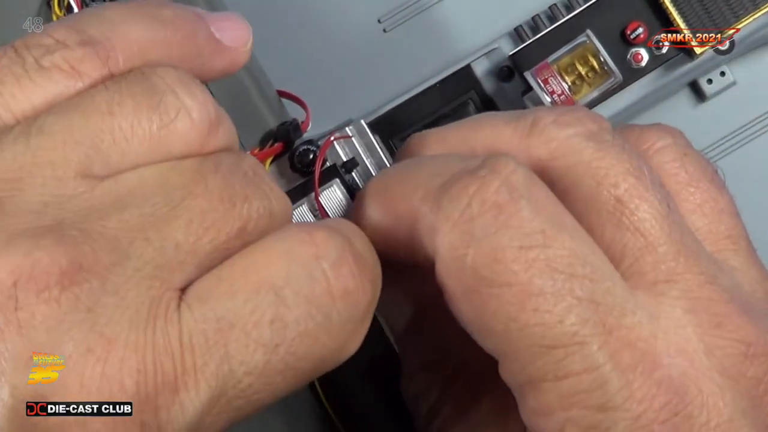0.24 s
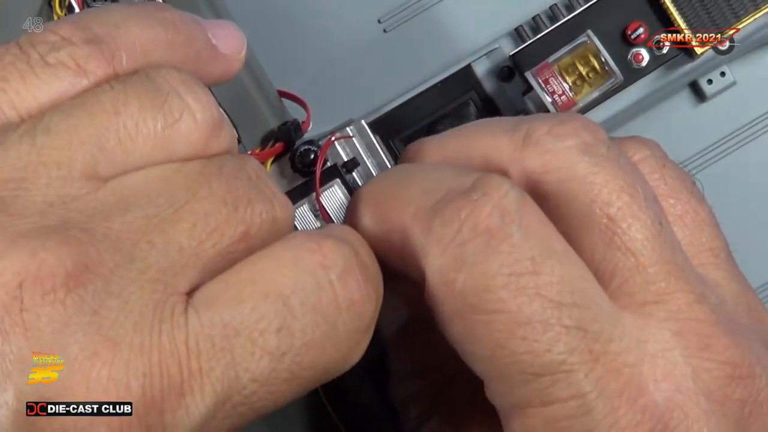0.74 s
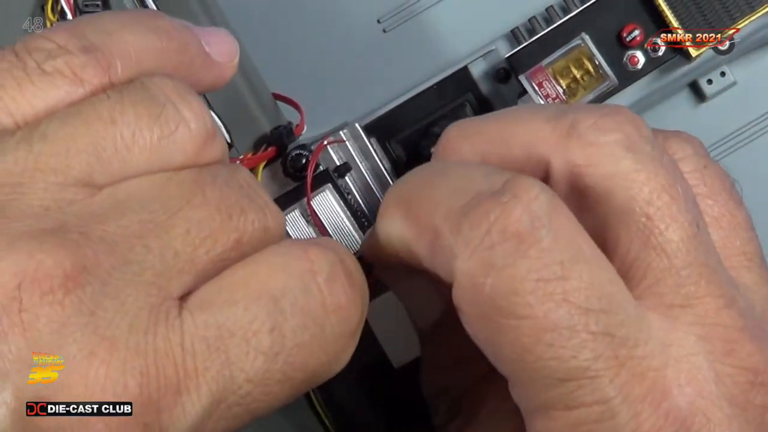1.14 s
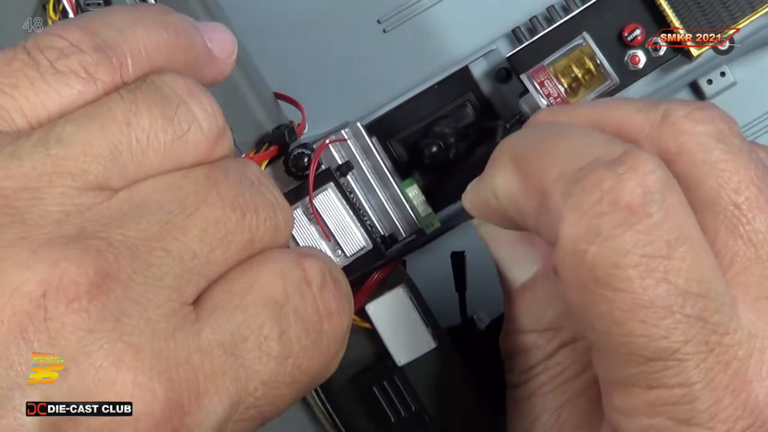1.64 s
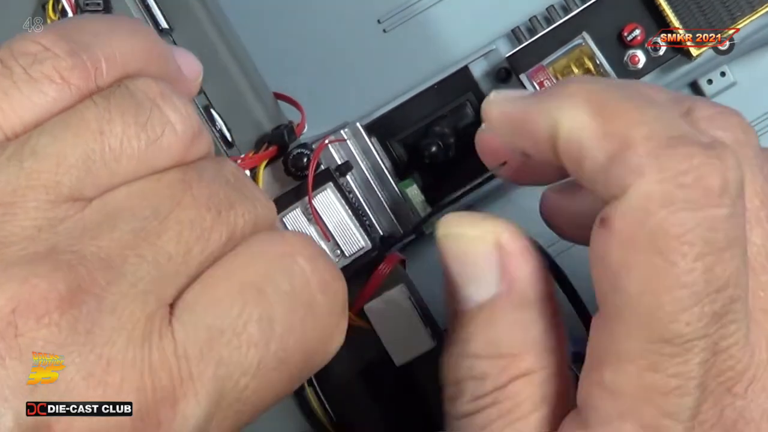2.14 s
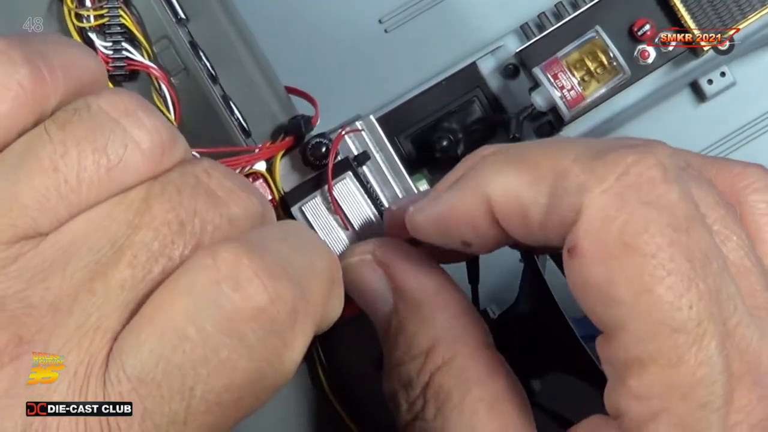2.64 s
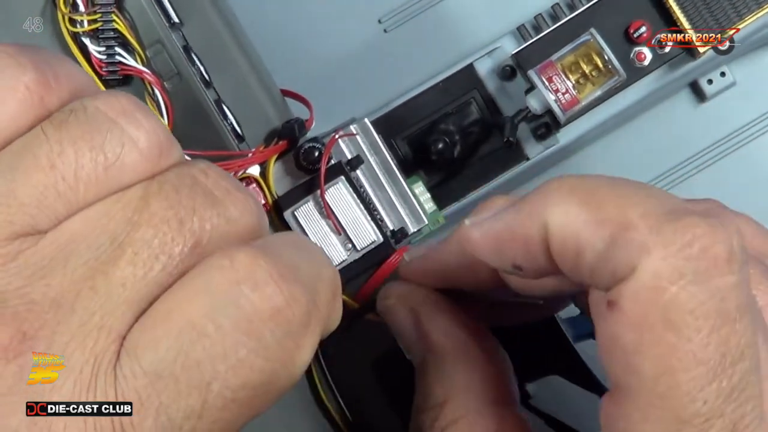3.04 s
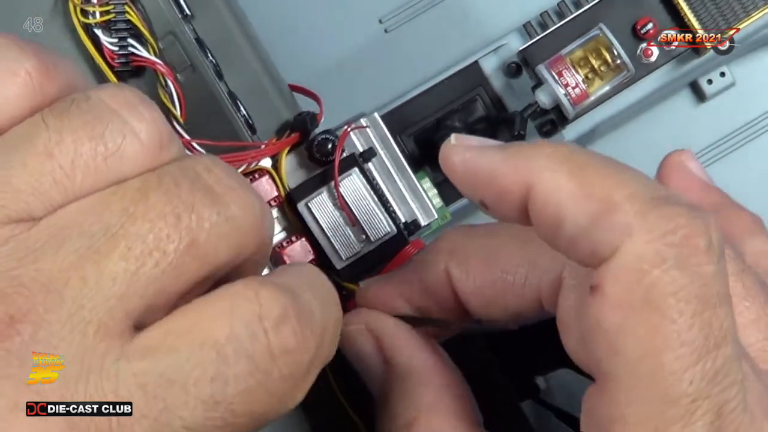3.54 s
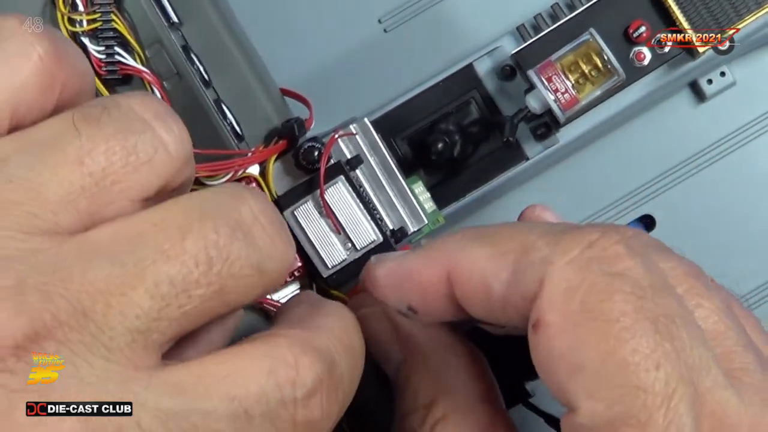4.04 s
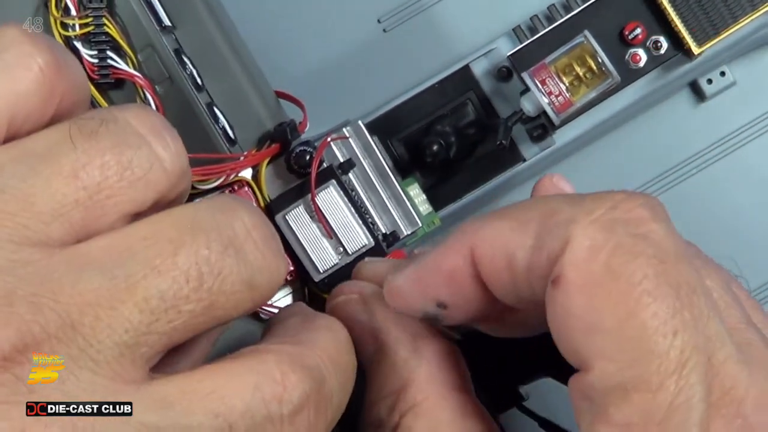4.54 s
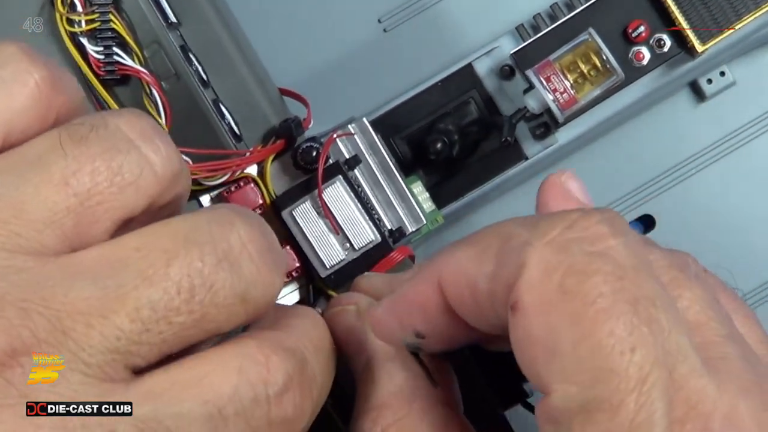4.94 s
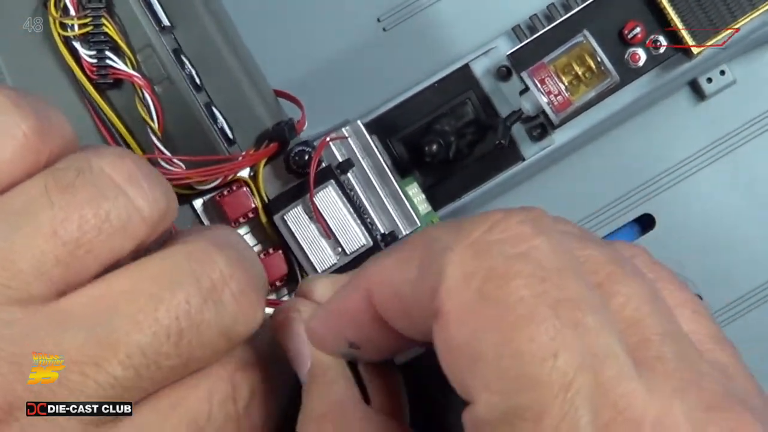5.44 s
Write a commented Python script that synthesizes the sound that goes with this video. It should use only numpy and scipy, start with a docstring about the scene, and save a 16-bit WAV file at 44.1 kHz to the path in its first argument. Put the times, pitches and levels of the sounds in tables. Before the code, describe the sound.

A close, quiet workbench, heard in stereo with the hands slightly to the right. Soft hiss, a thin high whine and a barely audible electrical buzz run throughout. From 0 to 0.75 s, only faint finger and wire touches. At 0.8 s the first nylon tie tightens with a tiny burst of crisp clicks; stronger separate snaps come at 1.04-1.1 s, then a very fast zip around 1.2-1.3 s, and further short volleys until 1.65 s, with a last click at 1.8 s. A brief rustle and soft tap follow. Sparse light touches continue, with a small plastic clack at 2.8 s. A very faint tone sinks from about 3.5 to 4.3 s. From 4.7 to 5.25 s the second tie clicks more slowly and unevenly, slightly more ringing. A sharp, hard plastic knock lands at 5.27 s, trailing into small taps and rising rustle until the end.

```python
"""Two cable ties pulled tight

Two nylon cable ties are pulled tight around a small board on a plastic chassis; each tooth snaps past the pawl.
Fingers nudge wires and plastic parts in between. Snaps and touches are short noise rattles through resonances.
A quiet room hisses and hands rustle (coloured noise); electronics whine (sines) and buzz (puffs of noise).
A faint far tone sinks slowly (a sine).
"""
import sys
import numpy as np
from scipy import signal
from scipy.fft import rfft, irfft
from scipy.io import wavfile

SR = 44100
rng = np.random.default_rng(int(sys.argv[2]) if len(sys.argv) > 2 else 0)


def generate_wav(signal):
    """Clip the signal to [-1, 1] and save it as 16-bit WAV at the path in sys.argv[1]."""
    frames = np.transpose(np.atleast_2d(signal))
    scaled = np.clip(frames, -1, 1) * 32767
    pcm = np.round(scaled).astype(np.int16)
    wavfile.write(sys.argv[1], SR, pcm)


N = 250488

# a tooth snaps past the pawl; grip and zone shares are added to its level: (time [s], level [dB])
TOOTH_SNAPS = [(0.8061, -17.5), (0.8091, -17.5), (0.8181, -19.5), (0.8246, -18.5), (0.8286, -18.0),
               (0.8351, -19), (0.8412, -18.5), (0.8492, -15.5), (0.8532, -22), (0.8674, -17.5),
               (1.0363, -14.0), (1.0486, -13.5), (1.0666, -12), (1.0789, -10.5), (1.0963, -13),
               (1.1781, -15), (1.1852, -11.5), (1.193, -12.5), (1.1979, -17), (1.3378, -17),
               (1.3508, -17.5), (1.3621, -16), (1.3713, -17.0), (1.3808, -16.5), (1.3913, -16.0),
               (1.4059, -17), (1.477, -15), (1.494, -16.0), (1.513, -16.5), (1.5229, -19.5), (1.5415, -17),
               (1.5715, -18.5), (1.5799, -18.5), (1.6036, -19), (1.6126, -18), (1.639, -19.5),
               (1.6557, -19.5), (1.7923, -17.5), (4.7074, -17), (4.7356, -16.5), (4.7546, -17.5),
               (4.7723, -18.5), (4.8275, -16.5), (4.855, -18), (4.8719, -19), (4.8907, -17.5),
               (4.9433, -17.5), (4.9877, -18.0), (5.0822, -17), (5.1318, -17.5), (5.2049, -18),
               (5.2451, -17)]
# the grip on the strap sets the colour of a pull:
# (start [s], body [dB], fizz [dB], extra weight in the lowest zone [dB])
GRIPS = [(0.8, -4.5, 5.5, -2.5), (1.03, -5.5, 1, -5), (1.17, -2.1, 4.5, -2.5), (1.2, 3.5, 4, 4),
         (1.225, 8, 3.5, 1.5), (1.25, 9, 4.5, 2.5), (1.33, -3, -9, -3), (1.47, -1.2, -2, 0),
         (1.56, -0.4, -2.5, -0.3), (1.78, -2, -12, 1.8), (4.7, -1.5, 1, -1.3), (4.82, -0.2, -2.5, -2.1),
         (4.93, -0.1, -0.5, -1), (5.07, 0.5, 2, 2), (5.2, 2, 1, 2.5)]
# fingers, wires and parts touch the chassis:
# (time [s], level [dB], centre [Hz], narrowness [dB per squared octave, below 0 counts as 0])
TOUCHES = [(0.003, -50, 6500, 4), (0.017, -45, 3500, 2.5), (0.028, -50, 3200, 12), (0.06, -37.5, 6300, 1.5),
           (0.137, -48.5, 3000, 2), (0.189, -39, 3970, 7.5), (0.238, -48.5, 1100, 5),
           (0.278, -50.5, 2000, 2), (0.629, -45, 7000, 6), (0.631, -42, 1510, 5), (0.756, -54, 2500, -0.2),
           (1.832, -37.5, 3000, 0.4), (1.844, -31, 1510, 1.2), (1.958, -49, 1500, 3),
           (2.011, -46, 11000, 1), (2.025, -52, 9000, 2.5), (2.088, -47, 3400, 3.5),
           (2.099, -43.5, 2900, 3), (2.413, -46.5, 700, 5), (2.565, -55, 10000, 4),
           (2.7647, -42.5, 3980, 0.5), (2.7807, -31, 5500, 1), (2.79, -24.5, 5500, 1.5),
           (2.794, -26, 2800, 4), (2.8079, -36, 5500, 0.5), (2.819, -42, 2700, 1), (2.956, -49, 2800, 3),
           (3.067, -49, 3400, 9), (3.12, -49, 2500, 8), (3.49, -43, 700, 8), (3.506, -47, 700, 8),
           (3.527, -40.5, 4530, 2.2), (3.549, -50, 700, 8), (3.672, -43.5, 6300, 9),
           (3.928, -44, 1210, 4.5), (3.958, -49.5, 3000, 1.5), (4.071, -48, 1950, 9), (4.13, -53, 9400, 12),
           (4.151, -48.5, 1150, 4.5), (5.271, -23.5, 2500, 0.1), (5.2723, -18.5, 6000, 0.8),
           (5.278, -20, 1210, .9), (5.287, -27, 1300, .8), (5.302, -31, 2000, 3),
           (5.313, -42.5, 6000, -0.3), (5.329, -41, 2800, 0.1), (5.351, -48, 1500, 1),
           (5.379, -50, 1800, 7), (5.412, -47, 4470, 0.2), (5.452, -42, 2200, 1.8), (5.523, -37, 1260, 6.5),
           (5.556, -38.5, 3000, 4.5), (5.579, -38.5, 4540, 1.2), (5.588, -40.5, 4500, 0.5),
           (5.612, -36, 680, 1), (5.626, -52, 700, 4)]
# six pitch zones, low to high: (bottom [Hz], top [Hz])
ZONES_HZ = [(320, 1450), (1450, 2600), (2600, 4500), (4500, 8000), (8000, 11000), (11000, 18000)]
# time a snap takes to fall by 60 dB, one per zone: (time [s])
SNAP_T60_S = [0.063, 0.031, 0.018, 0.018, 0.016, 0.0073]
# the same for a soft touch: (time [s])
TOUCH_T60_S = [0.082, 0.038, 0.014, 0.031, 0.013, 0.034]
# resonances of each tie with the chassis under it: (pitch [Hz], width [Hz], gain [dB])
FIRST_TIE = [(398, 66, -15), (965, 230, -3), (1340, 66, -4.5), (2040, 200, -3), (2340, 90, -2),
             (3190, 293, 1.5), (3825, 225, 0), (5900, 830, -2.5), (9890, 650, 0), (11860, 890, -2.5),
             (13000, 300, -32)]
SECOND_TIE = [(435, 810, -19), (1362, 65, -1.5), (2035, 200, 0.5), (2313, 213, 5), (2934, 57, 7),
              (4130, 65, 0.5), (5530, 300, -2.5), (8900, 130, -13), (10120, 730, 0.5), (11400, 640, -6),
              (12900, 350, -2)]
# resonances of the chassis alone: (pitch [Hz], width [Hz], gain [dB])
CHASSIS = [(373, 35, -19), (1355, 53, -2), (2000, 470, -15.5), (3046, 340, -4.5), (4000, 130, -16),
           (6100, 300, -25), (10230, 1200, -1)]
# share of a snap in each zone at a middling grip: (level [dB])
FIRST_SHARE_DB = [-21, -14.5, -9, -11.5, -6.5, -8]
SECOND_SHARE_DB = [-16, -16, -9, -6.5, -7, -5.5]
# how far each zone follows the body of a grip, and its fizz: (factor [no unit])
BODY_REACH = [0.084, 1.15, 0.2, 0.3, -.1, -0.14]
FIZZ_REACH = [-0.26, -0.18, -0.34, 0.049, -0.14, 0.96]
# reflections around the bench, one per zone: (level [dB]), then (left-right likeness [no unit])
WASH_DB = [-7.5, -6, -12, -6.5, -16.5, -13]
WASH_ALIKE = [0.36, 0.91, 0.97, 0.32, 0.98, 0.86]
# how far the right side runs ahead of the left: (pitch [Hz], lead [radians])
RIGHT_LEAD = [(100, 0.11), (860, 0.69), (3000, 0.66), (8000, 0.45), (15000, 0.1)]
# clothes and skin rustle as the hands move: (time [s], level [dB])
RUSTLE = [(0, -50.5), (.06, -61.5), (.7, -59.5), (1.77, -58), (1.82, -44.5), (1.87, -54), (2.15, -61.5),
          (2.7, -59), (2.95, -56.5), (3.4, -72), (3.55, -57), (4.2, -68.5), (5.2, -54), (5.5, -50.5),
          (5.6, -47.5), (5.68, -52)]
# spectrum of the rustle: (pitch [Hz], level [dB per Hz])
RUSTLE_COLOUR = [(88, -47), (150, -8.5), (413, -5), (1350, 0), (1610, -8), (2620, -6), (4790, -13),
                 (10400, -12), (15700, -21)]
# spectrum of the room hiss: (pitch [Hz], level [dB per Hz])
HISS_COLOUR = [(15, -56), (25, -22), (75, -23.5), (129, -7.5), (199, -14), (360, -6.5), (2310, -10),
               (2500, -4), (2710, -13.5), (3360, -10), (4400, -15.5), (6770, -14.5), (7540, -17),
               (14400, -19), (15600, -14.5)]
# how alike the hiss is left and right: (pitch [Hz], likeness [-1 to 1])
HISS_ALIKE = [(60, 0.45), (130, 1), (290, 0.39), (640, -0.15), (1410, -0.42), (3100, -0.011), (6820, 0.14),
              (15000, 1)]
# the two thin whines: (pitch [Hz])
WHINE_HZ = [2518, 15735]
# their strength: (level [dB], waver [dB])
WHINES = [(-59, 1.9), (-60.5, .4)]
# small resonances of the buzz: (pitch [Hz], width [Hz], level [dB])
BUZZ = [(3455, 95, -64), (4054, 53, -67.5), (5050, 120, -70.5), (6750, 300, -69.5)]
# a faint far tone sinks slowly: (time [s], pitch [Hz], level before FAR_TONE_LIFT_DB [dB])
FAR_TONE = [(3.48, 706, -84), (3.55, 691, -67), (3.75, 663, -68), (4.0, 630.5, -70), (4.28, 607, -68),
            (4.36, 609, -90)]

SECOND_TIE_S = 3.0   # snaps from here on belong to the second tie
# one fast zip of teeth
ZIP_START_S, ZIP_TEETH, ZIP_DB = 1.2045, 15, -20
ZIP_GAP_S, ZIP_LAST_DELAY_S = 0.004, 0.0076
REBOUND_S = 0.0015   # the pawl lands, then slaps back; the rattle swells in between
THUD_DB, THUD_HZ, THUD_T60_S = -33, 59, 0.19   # level is relative to the lowest zone
WASH_T60_S, WASH_BUILD_S = 0.11, 0.0034
RIGHT_DB = 0.6
FAINT_TOUCHES, FAINT_DB, FAINT_NARROW_DB = 8, -56, 5   # lighter touches fall anywhere
UNEVEN_DB = 2     # no touch fills the zones smoothly
BASS_LOSS = 2.2   # small parts radiate little below their centre: the fall is this much steeper there
HISS_DB, ROOM_TOP_HZ = -50, 15900
BUZZ_HZ, BUZZ_START_S = 59.94, 0.0105
BUZZ_WEAK_DB, BUZZ_WIDTH = -5, 0.14   # every other puff is weaker; width is a share of a turn
FAR_TONE_LIFT_DB = 3
CUTOFF_HZ = 17100


def ties():
    """Each snap takes the colour and fine pattern of its pull; the first tie is pulled early, the second late."""
    times, db = np.transpose(TOOTH_SNAPS + fast_zip())
    starts, body, fizz, weight = np.transpose(GRIPS)
    pull = np.searchsorted(starts, times + 0.004) - 1   # the latest grip, with 4 ms of slack
    zone_db = db[:, None] + np.outer(body[pull], BODY_REACH) + np.outer(fizz[pull], FIZZ_REACH)
    zone_db[:, 0] += weight[pull]
    first = times < SECOND_TIE_S
    second = ~first
    first_tie = blows(times[first], zone_db[first] + FIRST_SHARE_DB, pull[first], SNAP_T60_S, FIRST_TIE,
                      tick_db=12, rebound_db=-5, swell_s=0.0005, alike=0.7)
    second_tie = blows(times[second], zone_db[second] + SECOND_SHARE_DB, pull[second], SNAP_T60_S, SECOND_TIE,
                       tick_db=8.2, rebound_db=1.5, swell_s=0.00058, alike=0.69)
    return first_tie + second_tie


def fast_zip():
    """Teeth of one zip: the strap runs evenly, then slows, each delay twice the one before."""
    delays = ZIP_LAST_DELAY_S / 2 ** np.arange(ZIP_TEETH - 1)[::-1]
    times = ZIP_START_S + np.cumsum([0, *(ZIP_GAP_S + delays)])
    return [(s, ZIP_DB) for s in times]


def touches():
    """Soft contacts that swell slowly, each strongest around its own centre."""
    faint = [(when * N / SR, FAINT_DB, 700 * 2 ** (4 * high), FAINT_NARROW_DB)
             for when, high in rng.random((FAINT_TOUCHES, 2))]
    s, db, hz, narrow = np.transpose(TOUCHES + faint)[:, :, None]
    octaves = np.log2(np.sqrt(np.prod(ZONES_HZ, axis=1)) / hz)   # from the centre to each zone
    steepness = np.maximum(narrow, 0) * np.where(octaves < 0, BASS_LOSS, 1)
    zone_db = db - steepness * octaves ** 2 + UNEVEN_DB * rng.standard_normal(octaves.shape)
    one_spot = np.zeros(len(s), int)
    return blows(s[:, 0], zone_db, one_spot, TOUCH_T60_S, CHASSIS,
                 tick_db=2.3, rebound_db=1.5, swell_s=0.001, alike=0.089)


def blows(times, zone_db, spot, t60s, modes, tick_db, rebound_db, swell_s, alike):
    """A tick, a short rattle and a wash of reflections, all coloured by the resonances of the struck body."""
    t = np.arange(SR // 5) / SR
    shape = (len(times), 3, len(t))   # rattle, and mid and side of the wash
    # blows on one spot repeat part of their fine pattern
    spot_pattern = rng.standard_normal((len(GRIPS), *shape[1:]))[spot]
    chance = np.sqrt(alike) * spot_pattern + np.sqrt(1 - alike) * rng.standard_normal(shape)
    landing = t == 0
    slap_back = np.arange(len(t)) == round(REBOUND_S * SR)
    ticks = from_db(tick_db) * (landing + from_db(rebound_db) * slap_back)
    # reflections build up in a few milliseconds
    late = from_db(-60 * t / WASH_T60_S) * (1 - np.exp(-t / WASH_BUILD_S))

    sound = np.zeros(shape)
    early = round(0.003 * SR)   # the first 3 ms set the level of the rattle
    for k, (low, high) in enumerate(ZONES_HZ):
        swell = 1 - 0.8 * np.exp(-t / (swell_s + 0.72 / low))   # lows start later
        decay = from_db(-60 * np.maximum(t - REBOUND_S, 0) / t60s[k])
        rattle = band(chance[:, 0] * swell * decay + ticks, low, high)
        rattle /= np.sqrt(np.mean(rattle[:, :early] ** 2, axis=1, keepdims=True))
        even_width = np.sqrt(SR / 2 / (high - low))   # narrow zones are not quieter
        wash = from_db(WASH_DB[k]) * even_width * band(chance[:, 1:] * late, low, high)
        wash = wash * np.sqrt([[1 + WASH_ALIKE[k]], [1 - WASH_ALIKE[k]]])
        zone = np.concatenate([rattle[:, None], wash], axis=1)
        # alternate signs join the zones without gaps
        sound += (-1) ** k * from_db(zone_db[:, k, None, None]) * zone

    # the bench gives way under every blow
    thud = band(chance[:, 1] * from_db(-60 * t / THUD_T60_S), THUD_HZ, 2.9 * THUD_HZ)
    thud = from_db(THUD_DB + zone_db[:, :1]) * rms_one(thud)
    ringing = sum(from_db(db) * resonance(sound, hz, width) for hz, width, db in modes)
    sound = 0.51 * sound + ringing
    sound[:, 0] += thud

    out = np.zeros((3, N + len(t)))
    for s, blow in zip(times, sound):
        start = round(s * SR)
        out[:, start:start + len(t)] += blow
    near, mid, side = out[:, :N]
    return microphones(near + mid) + side * [[1], [-1]]


def microphones(x):
    """The hands are a little to the right: that side hears them first and louder."""
    lead = at_hz(RIGHT_LEAD, np.fft.rfftfreq(N, 1 / SR))
    left = irfft(rfft(x) * np.exp(-1j * lead), N)
    return np.array([left, from_db(RIGHT_DB) * x])


def rustle():
    """Skin and wires rub: noise with a fast unevenness."""
    s, db = np.transpose(RUSTLE)
    level = from_db(np.interp(np.arange(N) / SR, s, db) + 2.6 * drift(100))
    return level * stereo_noise(N, RUSTLE_COLOUR, [(100, 0.55), (1000, 0.47), (14000, 1.0)])


def room_hiss():
    """The quiet room: steady coloured noise, partly alike in both channels."""
    return from_db(HISS_DB) * stereo_noise(N, HISS_COLOUR, HISS_ALIKE)


def electronics():
    """Two thin wavering whines, and strong-weak puffs of noise at the field rate into small resonances."""
    t = np.arange(N) / SR
    whine = np.zeros(N)
    for hz, (db, waver_db) in zip(WHINE_HZ, WHINES):
        level = np.sqrt(2) * from_db(db + waver_db * drift(19))   # root 2 makes the level an rms
        whine += level * np.sin(2 * np.pi * hz * t + 0.87 * waver_db * drift(6.6))
    turns = (t - BUZZ_START_S) * BUZZ_HZ
    from_peak = (turns + 0.5) % 1 - 0.5
    puffs = np.exp(-(from_peak / BUZZ_WIDTH) ** 2) * from_db(BUZZ_WEAK_DB * (np.round(turns) % 2))
    puffs = puffs * rng.standard_normal(N)
    buzz = sum(from_db(db) * rms_one(resonance(puffs, hz, width)) for hz, width, db in BUZZ)
    return whine + buzz


def far_tone():
    """A sine on a falling pitch."""
    s, hz, db = np.transpose(FAR_TONE)
    t = np.arange(N) / SR
    level = from_db(np.interp(t, s, db, left=-200, right=-200) + FAR_TONE_LIFT_DB)
    return level * np.sin(2 * np.pi * np.cumsum(np.interp(t, s, hz)) / SR)


def from_db(db):
    """Gain of a level in dB."""
    return 10 ** (np.asarray(db) / 20)


def rms_one(x):
    """Scaled to rms 1."""
    return x / np.sqrt(np.mean(x ** 2) + 1e-20)


def at_hz(points, hz):
    """A spectrum table read on a log axis."""
    table_hz, values = np.transpose(points)
    return np.interp(np.log(hz + 1), np.log(table_hz), values)


def band(x, low, high):
    """Butterworth band-pass: keeps the pitches between low and high."""
    return signal.sosfilt(signal.butter(2, [low, high], "band", fs=SR, output="sos"), x)


def resonance(x, hz, width):
    """Two-pole resonance, gain 1 on top; the narrower, the longer it rings."""
    r = np.exp(-np.pi * width / SR)
    feedback = [1, -2 * r * np.cos(2 * np.pi * hz / SR), r * r]
    return signal.lfilter(np.array([1, 0, -1]) * (1 - r * r) / 2, feedback, x)


def drift(rate):
    """Slow chance with spread 1: smoothed noise, one value every 40 samples, joined by lines."""
    r = np.exp(-80 * np.pi * rate / SR)
    slow = signal.lfilter([1], [1, -2 * r, r * r], rng.standard_normal(N // 40 + 2002))
    slow = slow[2000:]   # skip the filter's start
    return np.interp(np.arange(N) / 40, np.arange(len(slow)), rms_one(slow))


def stereo_noise(size, spectrum, alike):
    """Coloured noise in two channels that share the given likeness; rms 1."""
    hz = np.fft.rfftfreq(size, 1 / SR)
    mid, side = rfft(rng.standard_normal((2, size))) * from_db(at_hz(spectrum, hz))
    alike = np.clip(at_hz(alike, hz), -1, 1)
    both = np.sqrt(1 + alike) * mid + np.sqrt(1 - alike) * side * [[1], [-1]]
    return rms_one(irfft(both, size))


def scene():
    """Blows on the bench over the steady room."""
    room = room_hiss() + rustle()
    room = signal.sosfilt(signal.cheby2(16, 60, ROOM_TOP_HZ, fs=SR, output="sos"), room)   # cut the top
    return ties() + touches() + room + electronics() + far_tone()


def record(dry):
    """The top is cut steeply."""
    return signal.sosfilt(signal.cheby2(14, 60, CUTOFF_HZ, fs=SR, output="sos"), dry)


dry = scene()
out = record(dry)
generate_wav(out)
```